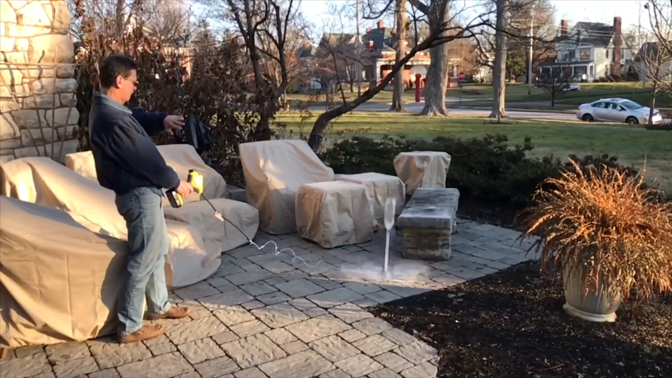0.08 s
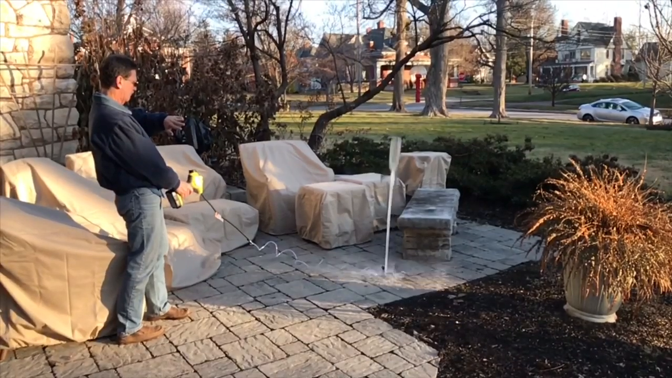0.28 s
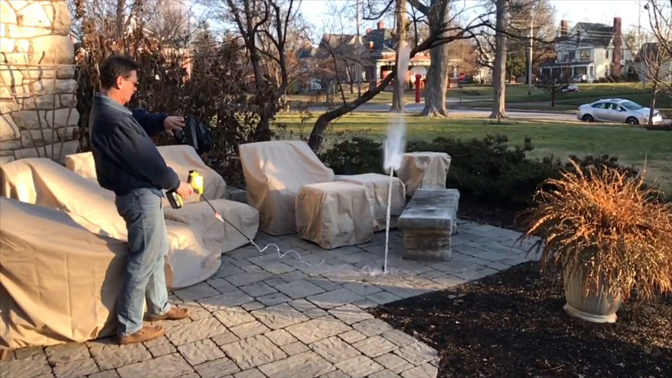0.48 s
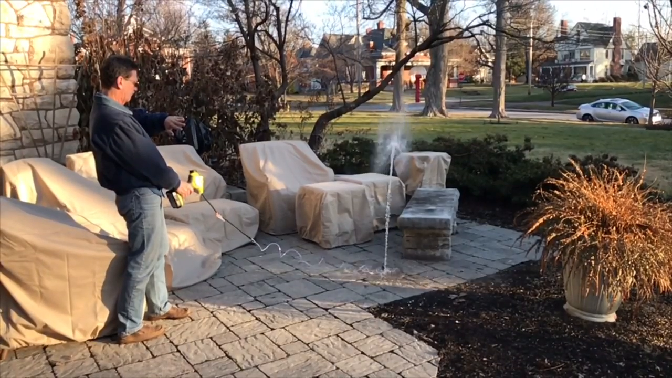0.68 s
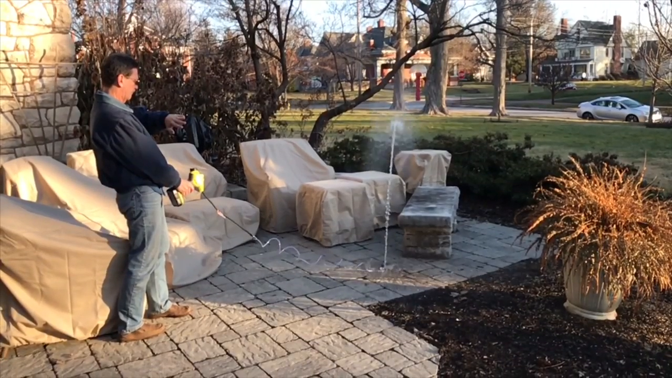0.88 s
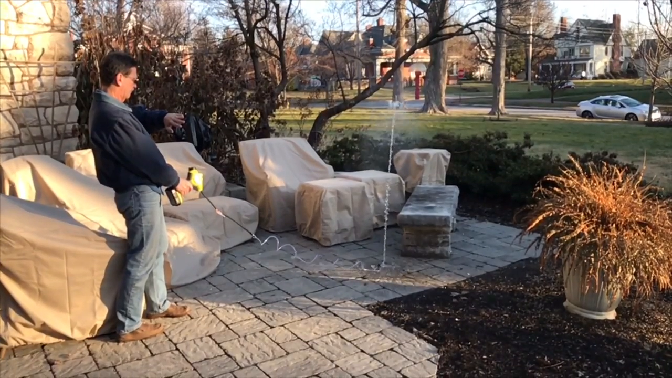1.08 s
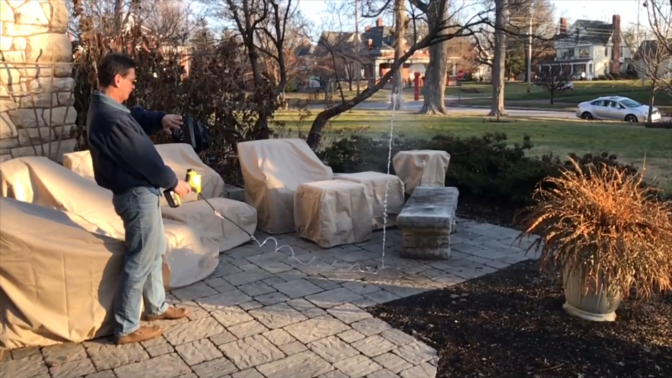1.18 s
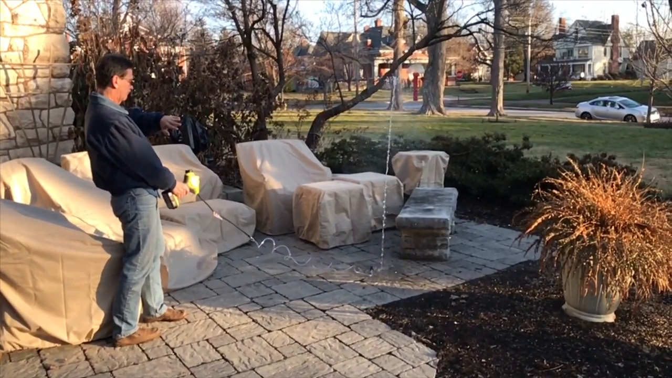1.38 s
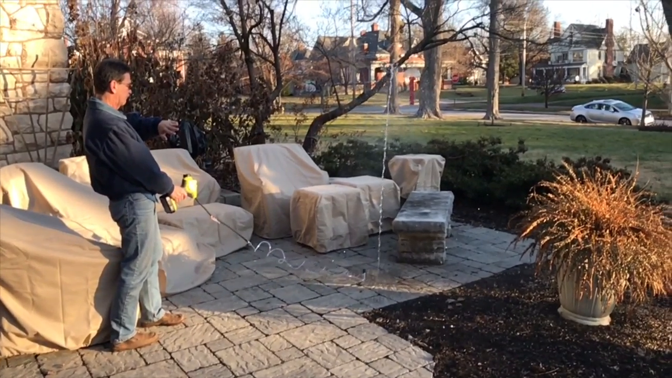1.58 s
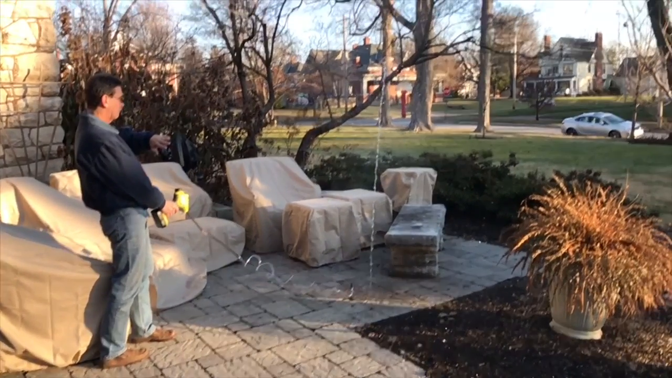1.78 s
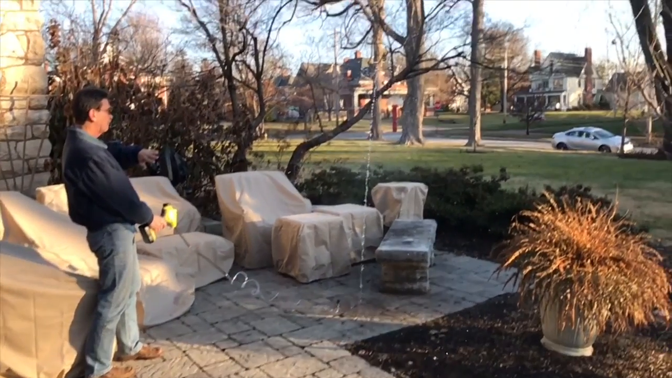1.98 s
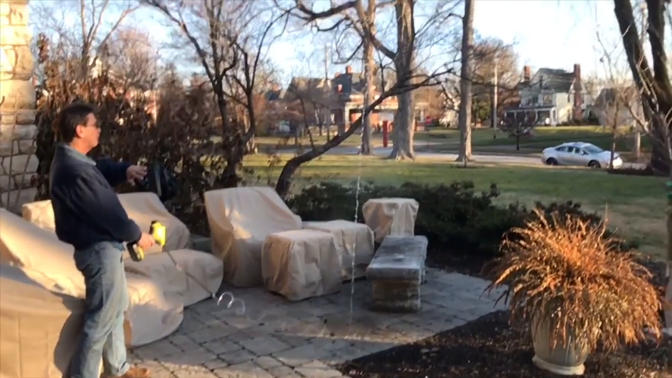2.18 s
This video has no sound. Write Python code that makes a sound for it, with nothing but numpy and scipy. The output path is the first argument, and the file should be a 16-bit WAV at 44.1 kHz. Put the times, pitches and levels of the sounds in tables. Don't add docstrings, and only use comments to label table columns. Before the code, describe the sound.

A plastic bottle rocket bursts off a patio with a loud low pop and hissing, gurgling water, then a weaker dull surge; a slowed cordless drill whirrs and puffs throughout, muffled, with air rumbling on the microphone.

```python
import sys
import numpy as np
from scipy import signal
from scipy.fft import rfft, irfft
from scipy.io import wavfile
from scipy.ndimage import uniform_filter1d

SR = 44100
rng = np.random.default_rng(int(sys.argv[2]) if len(sys.argv) > 2 else 0)


def how_loud(loudness_db):
    steps = np.asarray(loudness_db, float) / 20
    return 10 ** steps


def wav_record(signal):
    frames = np.transpose(np.atleast_2d(signal))
    bounded = np.clip(frames, -1, 1)
    quanta = np.round(bounded * 32767).astype(np.int16)
    wavfile.write(sys.argv[1], SR, quanta)


N = 97020

# [f/Hz, density/dB per Hz]
WHIRR_SPECTRUM = [(15, -39.5), (25, -14), (103, -9), (175, -10.5), (208, -9), (721, -15.5), (1100, -16.5),
                  (2220, -15.5), (2400, -12.5), (3120, -57.5), (5280, -120)]
# [f/Hz, width/Hz, level/dB, share of stroke load/0-1]
GEAR_WHINES = [(178, 23, -46.5, 0), (889, 46, -53.5, 1), (1090, 96, -47, 0.6), (2184, 160, -49.5, 0.6)]
# [t/s, puff level/dB, squeal level/dB, squeal f/Hz]
PUMP_STROKES = [(.012, 6, -42, 1137), (.063, 2.5, -37, 900), (.178, 7, -36.5, 900), (.55, 4, -47, 1090),
                (.67, 4, -41, 1090), (1.0, 6, -42, 1090), (1.091, 6.5, -50.5, 1090), (1.23, 4, -46.5, 890),
                (1.345, -0.5, -39.5, 1120), (1.475, 2.5, -40.5, 1100), (1.585, 4, -37.5, 1200),
                (1.71, 4, -35, 1095), (1.753, -1.5, -49, 1090), (1.845, 5, -34, 1035),
                (1.933, 4.5, -35, 2185), (1.967, 4, -37, 1095), (2.064, 5, -32, 1092),
                (2.10, 0.5, -35.5, 905), (2.19, 4.5, -44, 1090)]
# [t/s, half length/s, level/dB, f/Hz]
HUM_SWELLS = [(.045, 0.0052, -33.5, 187), (.10, 0.018, -34, 187), (.142, 0.0092, -30, 167.5),
              (.208, 0.025, -35, 173), (.63, 0.051, -32, 183.4), (.80, 0.053, -28, 178),
              (.92, 0.024, -31, 176.4), (1.01, 0.032, -34.5, 172.3), (1.22, 0.033, -39, 178),
              (1.35, 0.016, -36.5, 185), (1.54, 0.03, -34.5, 179.7), (1.585, 0.019, -33, 178),
              (1.78, 0.019, -38, 174.6), (1.87, 0.051, -45.5, 178), (1.96, 0.022, -38.5, 172),
              (2.07, 0.027, -36, 178)]
# [t/s, peak level/dB, f/Hz, ring/s]
PRESSURE_POPS = [(0.1739, -20, 190, 0.0037), (0.1963, -25, 200, .003), (.2385, -15.5, 928, .003),
                 (0.2445, -6.5, 118.6, 0.0066), (0.2664, 1, 143, .008), (0.2859, -2.5, 200.6, 0.0051),
                 (0.29, -11.5, 1592, 0.004), (.2935, -9.5, 344, .005), (0.305, -12, 255.7, .006),
                 (1.4761, -24.5, 1490, 0.0012), (0.3276, -7.5, 174.4, 0.0091), (0.3557, -11, 190, .012),
                 (0.554, -19.5, 144.2, 0.022), (.6990, -17.5, 400, 0.0035), (.7160, -12, 200, 0.0025),
                 (0.7268, -14.5, 150, 0.0088), (0.8296, -12, 172, 0.0039)]
# [t/s, hiss level/dB, gurgle level/dB, froth/0-1]
LAUNCH_JET = [
    (.2335, -51, -57, 0.51),
    (0.2374, -13.5, -27.5, 0.61),
    (0.249, -24.5, -26.5, 0.7),
    (0.2866, -24.5, -22.5, 0.05),
    (.290, -19, -18, 0.7),
    (0.333, -20.5, -20, 0.9),
    (0.387, -26.5, -27, 0.8),
    (0.559, -30, -30.5, 0.4),
    (0.681, -37, -38.5, 0.7),
]
# [t/s, hiss level/dB, gurgle level/dB, froth/0-1]
SECOND_SURGE = [
    (0.688, -53, -48, 0.48),
    (.72, -34.5, -35, 0.43),
    (0.769, -35, -32, 0.76),
    (.81, -31, -24, 0.88),
    (0.869, -26, -29, .9),
    (.90, -30.5, -35, .6),
    (0.942, -36.5, -34.5, 0.323),
    (1.081, -47, -36.5, 0.34),
    (1.298, -48.5, -48.5, 0.64),
]
# [f/Hz, density/dB per Hz]
HISS_SPECTRUM = [(290, -24), (500, -4), (646, -6), (862, -7), (1600, -9), (2400, -10), (3120, -56.5),
                 (5280, -120)]
# [f/Hz, width/Hz, level/dB]
BOTTLE_RESONANCES = [(94.1, 56, -0.5), (150, 60, 2.5), (267, 100, -0.5), (340, 110, 2), (465, 140, -2.5)]
# [t/s, level/dB]
AIR_SHOVE = [
    (0, -41),
    (.23, -61),
    (.27, -31),
    (.45, -41.5),
    (.87, -43),
    (.91, -40.5),
    (1.03, -38.5),
    (1.1, -44),
    (2.2, -49.5),
]
# [t/s, half length/s, peak level/dB, f/Hz]
AIR_GUST = (.967, .075, -25, 9)
# [f/Hz, gain/dB]
BAND_EDGE = [(2296, 0), (2322, -40), (2385, -47), (2430, -72)]


def level(x):
    return x / np.sqrt(np.mean(x ** 2))


def band(x, f_hz, width_hz):
    return signal.lfilter(*signal.iirpeak(f_hz, f_hz / width_hz, fs=SR), x)


def colour(x, points):
    p = np.array(points)
    f_hz = np.fft.rfftfreq(N, 1 / SR) + 1
    gain_db = np.interp(np.log(f_hz), np.log(p[:, 0]), p[:, 1])
    return level(irfft(rfft(x) * how_loud(gain_db), N))


def walk(rate_hz):
    hold = int(SR / rate_hz)
    steps = np.repeat(rng.standard_normal(N // hold + 1), hold)
    return level(uniform_filter1d(uniform_filter1d(steps, hold), hold)[:N])


def curve(rows, column):
    r = np.array(rows)
    return how_loud(np.interp(np.arange(N) / SR, r[:, 0], r[:, column], left=-120, right=-120))


def tone_swell(t, start_s, half_s, level_db, f_hz):
    bell = np.exp(-((t - start_s) / half_s) ** 2)
    return np.sqrt(2) * how_loud(level_db) * bell * np.sin(2 * np.pi * f_hz * (t - start_s))


def stroke_load_db(t):
    rise_s, fall_s = .004, .018
    load_db = np.zeros(N)
    for s, puff_db, _, _ in PUMP_STROKES:
        load_db += puff_db * np.exp(-np.where(t < s, ((s - t) / rise_s) ** 2, (t - s) / fall_s))
    return load_db


def drill(t):
    whirr_db, squeal_half_s = -34.5, .011
    load_db = stroke_load_db(t)
    whirr = colour(rng.standard_normal(N), WHIRR_SPECTRUM)
    out = how_loud(whirr_db + load_db + 0.66 * walk(30)) * whirr
    for f_hz, width_hz, whine_db, share in GEAR_WHINES:
        whine = level(band(band(rng.standard_normal(N), f_hz, width_hz), f_hz, width_hz))
        out += how_loud(whine_db + 2 * share * load_db + 2.0 * walk(14)) * whine
    for s, _, squeal_db, f_hz in PUMP_STROKES:
        out += tone_swell(t, s, squeal_half_s, squeal_db, f_hz)
    for s, half_s, hum_db, f_hz in HUM_SWELLS:
        out += tone_swell(t, s, half_s, hum_db, f_hz)
    return out


def pops(t):
    rise_cycles = 0.27
    out = np.zeros(N)
    for s, peak_db, f_hz, ring_s in PRESSURE_POPS:
        u = t - s
        envelope = np.exp(-np.where(u < 0, (u * f_hz / rise_cycles) ** 2, u / ring_s))
        out += how_loud(peak_db) * envelope * np.cos(2 * np.pi * f_hz * u)
    return out


def spray():
    flutter_db = 1.3
    noise = colour(rng.standard_normal(N), [(250, -24)] + list(HISS_SPECTRUM))
    return level(how_loud(flutter_db * walk(110)) * noise)


def bottle_gurgle(t):
    glugs_per_s, spread_db, froth_db_per_octave = 700, 2.2, 6.5
    chance = rng.random((N, 3))
    size = how_loud(-spread_db * np.log(1 - chance[:, 2]))
    glugs = (chance[:, 0] < glugs_per_s / SR) * np.sign(chance[:, 1] - .5) * size
    glugs = level(glugs) + .5 * rng.standard_normal(N)
    both = np.array(list(LAUNCH_JET) + list(SECOND_SURGE))
    tilt_db = froth_db_per_octave * (np.interp(t, both[:, 0], both[:, 3]) - .5)
    out = np.zeros(N)
    for k, (f_hz, width_hz, ring_db) in enumerate(BOTTLE_RESONANCES):
        ring = level(band(band(glugs, f_hz, width_hz), f_hz, 2 * width_hz))
        out += (-1) ** k * how_loud(ring_db - 6 + tilt_db * np.log2(f_hz / 200)) * ring
    return out


def jet(t):
    hiss, gurgle = spray(), bottle_gurgle(t)
    out = np.zeros(N)
    for rows in (LAUNCH_JET, SECOND_SURGE):
        out += curve(rows, 1) * hiss + curve(rows, 2) * gurgle
    return out


def yard_echo(hits, t):
    t60_s, echo_db, gap_s = 0.17, -18, .012
    u = t[:SR // 2]
    tail = rng.standard_normal(SR // 2) * how_loud(-60 * u / t60_s) * (u > gap_s)
    return how_loud(echo_db) * signal.fftconvolve(hits, tail / np.sqrt(np.sum(tail ** 2)))[:N]


def shove(t):
    s, half_s, peak_db, f_hz = AIR_GUST
    gust = how_loud(peak_db) * np.exp(-((t - s) / half_s) ** 2) * np.cos(2 * np.pi * f_hz * (t - s))
    push = level(band(band(rng.standard_normal(N), 14, 22), 14, 40))
    return gust + curve(AIR_SHOVE, 1) * push


def scene():
    t = np.arange(N) / SR
    hits = pops(t)
    return (drill(t) + hits + jet(t) + yard_echo(hits, t) + shove(t))[None]


def low_pass(x):
    return signal.sosfilt(signal.butter(12, 3590, fs=SR, output="sos"), x)


def record(dry):
    ceiling = .96
    soft = dry / (1 + np.abs(dry / ceiling) ** 6) ** (1 / 6)
    edge = how_loud(np.interp(np.fft.rfftfreq(2 * N, 1 / SR), *np.array(BAND_EDGE).T))
    mix = irfft(rfft(soft, 2 * N) * edge)[:, :N]
    return low_pass(mix)


dry = scene()
out = record(dry)
wav_record(out)
```